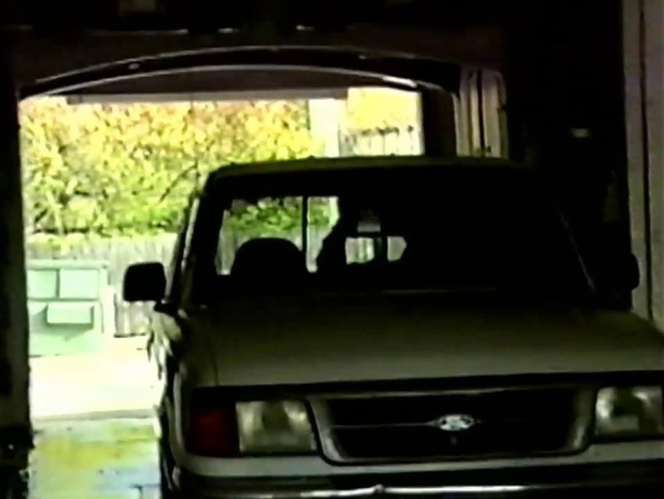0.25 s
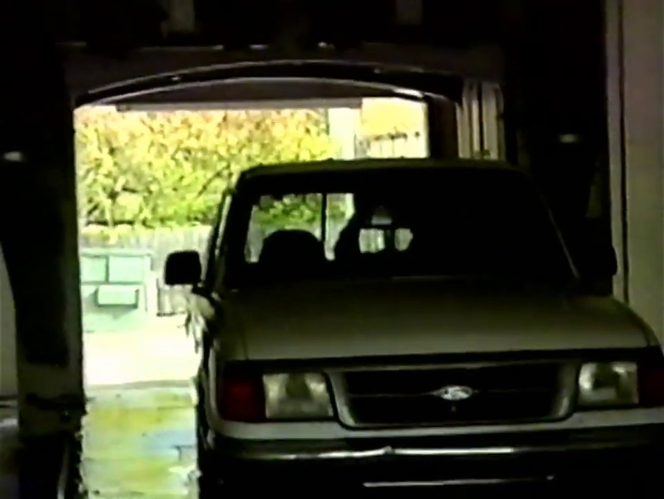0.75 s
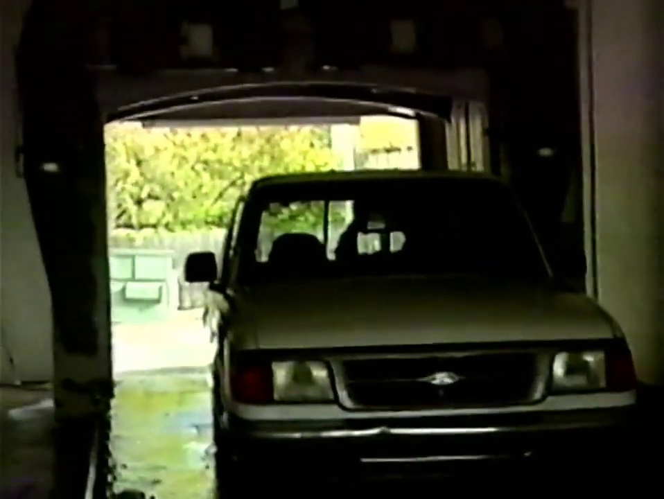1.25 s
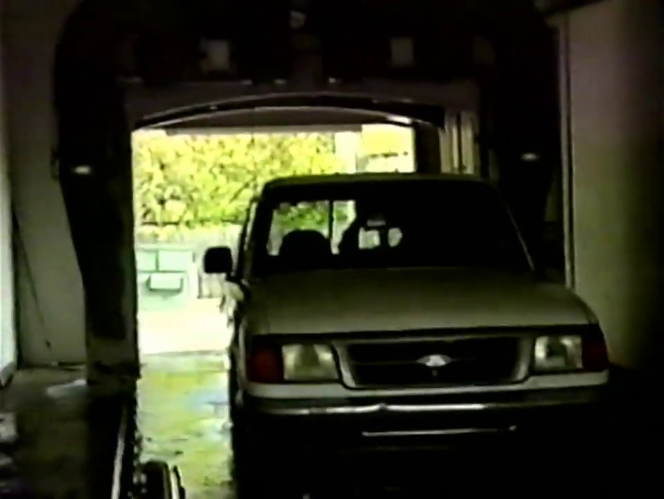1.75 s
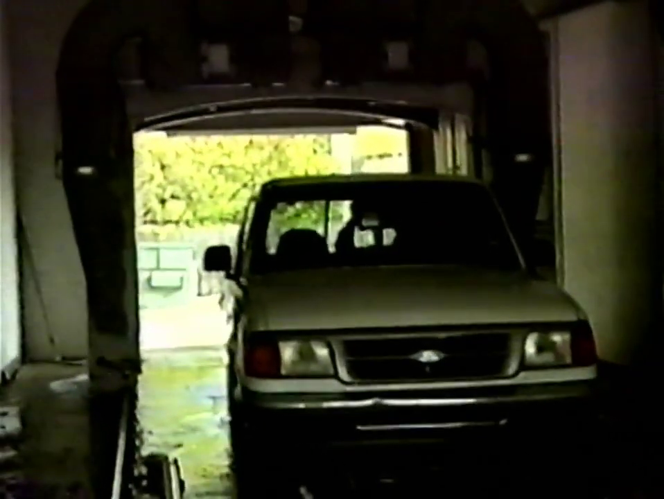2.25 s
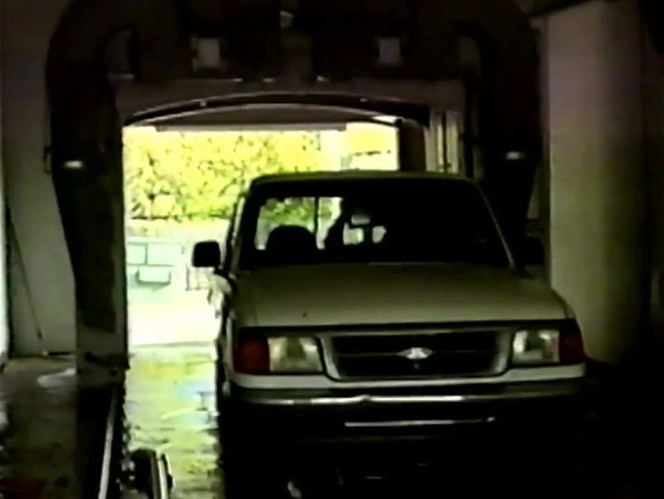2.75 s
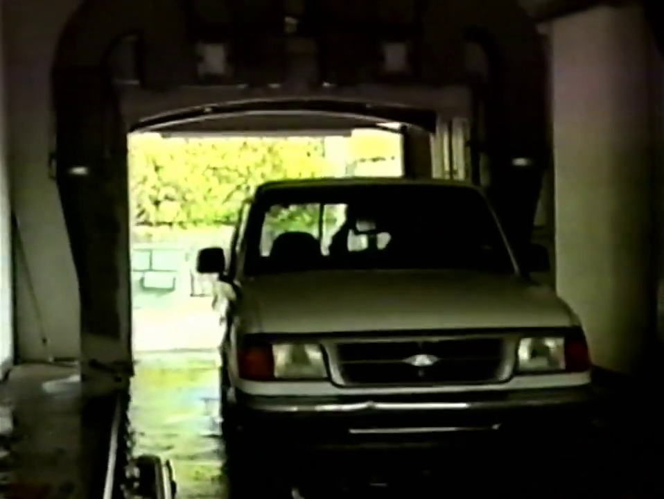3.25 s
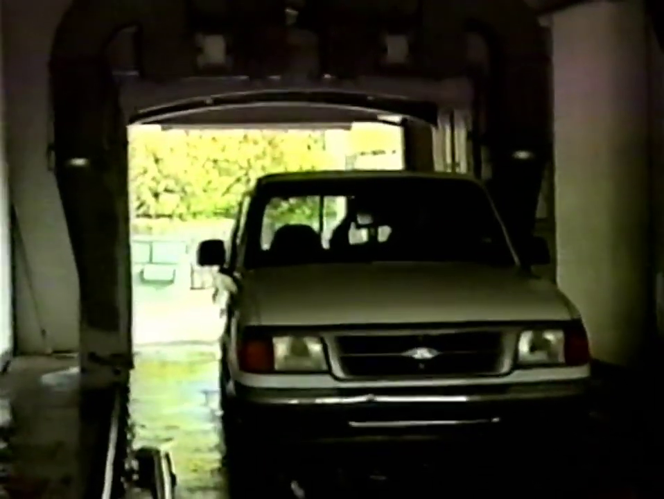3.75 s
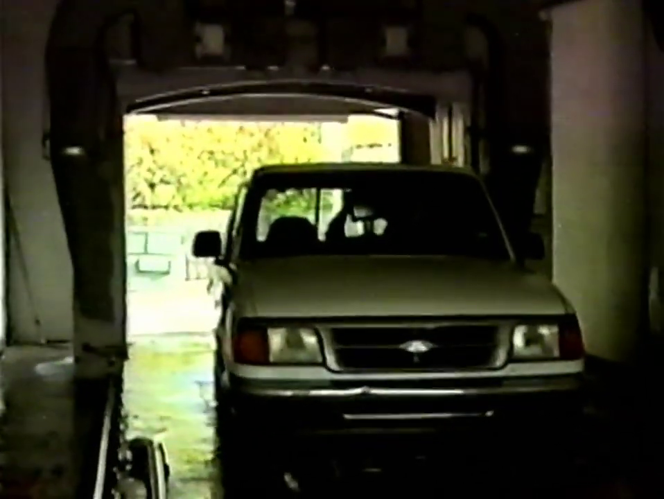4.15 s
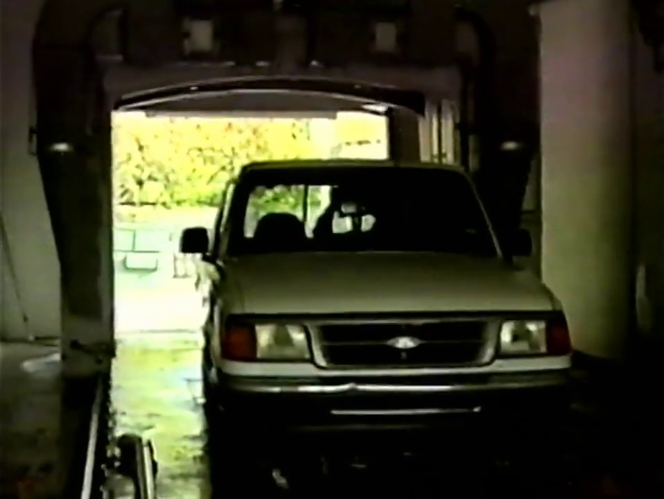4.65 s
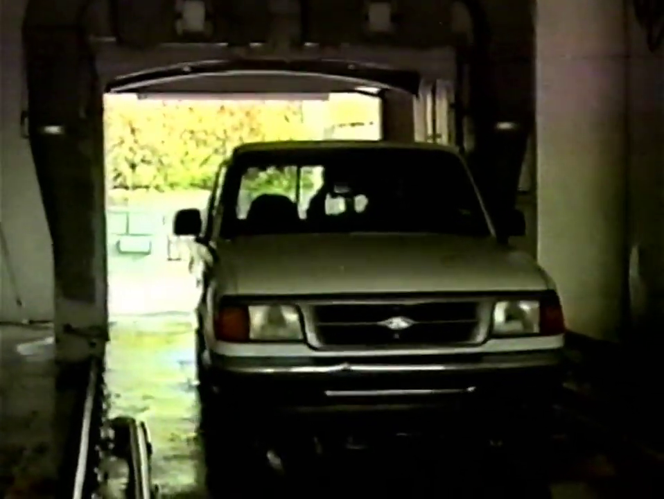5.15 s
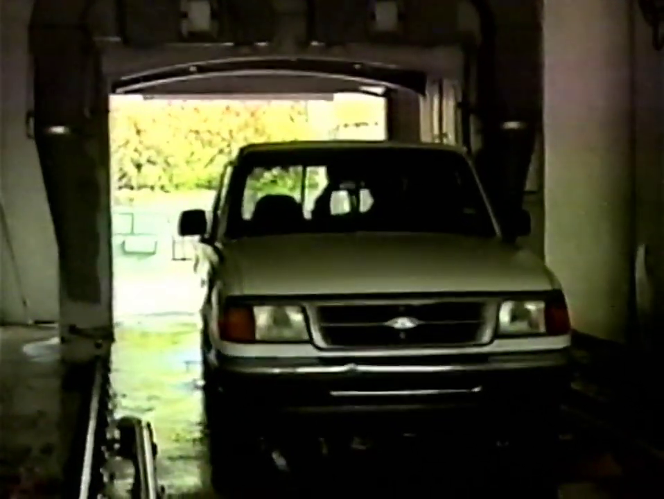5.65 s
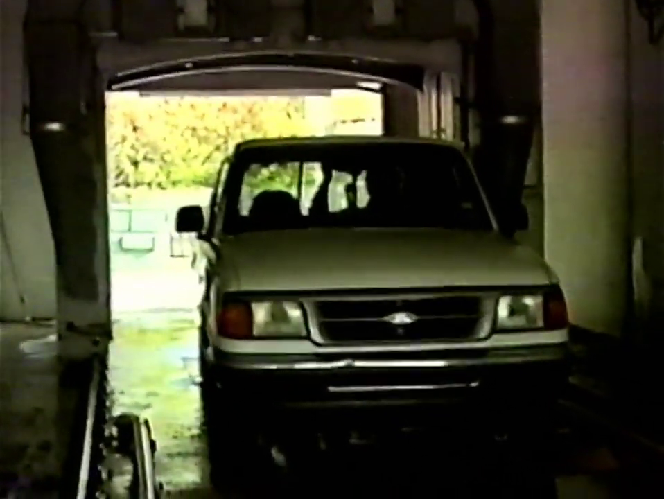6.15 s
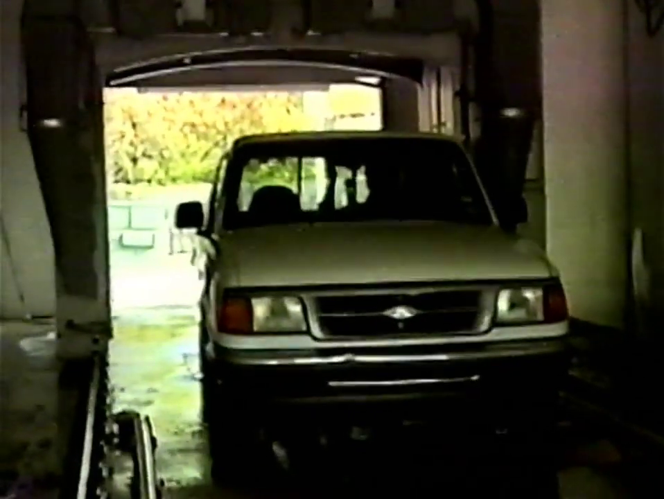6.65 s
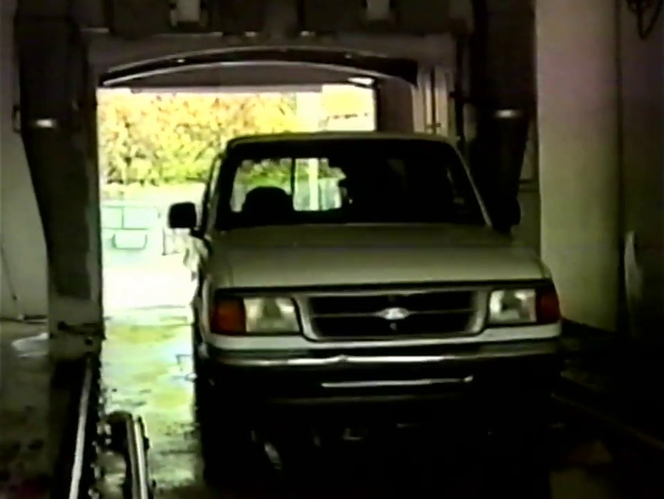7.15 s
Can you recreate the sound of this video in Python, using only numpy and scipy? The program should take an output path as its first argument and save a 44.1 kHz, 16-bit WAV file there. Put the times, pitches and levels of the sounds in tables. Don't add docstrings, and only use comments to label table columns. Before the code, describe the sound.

In a concrete wash bay with a pickup truck inside, two large blowers roar without pause. Their low, nearly equal blade drones beat together roughly twice a second, swelling and sinking over throaty rushing air and hollow wall resonance. An old camcorder microphone adds hiss, faint regular ticks, mains hum and a thin high whistle, with brief muffled drop-outs.

```python
import sys
import numpy as np
from scipy import signal
from scipy.fft import rfft, irfft, next_fast_len
from scipy.io import wavfile
from scipy.ndimage import uniform_filter1d, map_coordinates

SR = 44100
rng = np.random.default_rng(int(sys.argv[2]) if len(sys.argv) > 2 else 0)


def transcribe(u):
    v = np.clip(np.atleast_2d(u).T, -1, 1)
    q = np.round(v * 32767).astype(np.int16)
    wavfile.write(sys.argv[1], SR, q)


def elevation(decibels):
    levels = np.asarray(decibels, float)
    return 10 ** (levels / 20)


N = 326340
T = np.arange(N) / SR


def unit(x):
    return x / np.sqrt(np.mean(x ** 2) + 1e-20)


def along(points, hz):
    f, level = np.transpose(points)
    return np.interp(np.log(hz + 1), np.log(f + 1), level)


def curves(rows):
    times, *columns = np.transpose(rows)
    return [np.interp(T, times, column) for column in columns]


def wobble(rate):
    knots = rng.standard_normal(int(N * rate / SR) + 4)
    return map_coordinates(knots, [T * rate])


def filtered(x, response):
    size = next_fast_len(N + SR // 2)
    hz = np.fft.rfftfreq(size, 1 / SR)
    return irfft(rfft(x, size) * response(hz), size)[:N]


def rush(spectrum, patchy_db):
    cells = signal.stft(rng.standard_normal(N), nperseg=1024)[2]
    patches = uniform_filter1d(rng.standard_normal(cells.shape), size=5, axis=0)
    patches = unit(uniform_filter1d(patches, size=16, axis=1))
    patchy = signal.istft(cells * elevation(patchy_db * patches), nperseg=1024)[1][:N]
    return unit(filtered(patchy, lambda hz: elevation(along(spectrum, hz))))


def tone(hz):
    turns = np.cumsum(hz + 0 * T) / SR + rng.random()
    return np.sqrt(2) * np.sin(2 * np.pi * turns)


def wave(turns):
    return np.sqrt(2) * np.cos(2 * np.pi * turns)


# f/Hz, level/dB (per Hz)
DUCT_SPECTRUM = [(15, -58), (25, -34), (33, -43.5), (54, -34), (85, -38.5), (162, -14.5), (219, -7.5),
                 (254, -10), (295, -6.5), (375, -6.5), (476, -10), (500, -3.5), (650, -33), (1100, -120)]
# f/Hz, level/dB (per Hz)
NOZZLE_SPECTRUM = [(330, -32), (560, 0), (595, -2.5), (734, -3), (857, -6.5), (1050, -4.5), (1730, -9.5),
                   (2100, -16), (2730, -41.5), (4620, -120)]
# f/Hz, level/dB (per Hz)
JET_SPECTRUM = [(1120, -23.5), (1900, -3.5), (2110, 1), (5010, -10.5), (6010, -18), (7900, -36.5),
                (9000, -49.5), (11700, -70), (19800, -120)]


def air():
    gust = wobble(7)
    duct = elevation(-40.5 + .8 * wobble(3)) * rush(DUCT_SPECTRUM, patchy_db=.1)
    nozzle = elevation(-38 + .21 * gust + .15 * wobble(3)) * rush(NOZZLE_SPECTRUM, patchy_db=.5)
    jet = elevation(-43.6 + .46 * gust) * rush(JET_SPECTRUM, patchy_db=.44)
    return duct + nozzle + jet


# f/Hz, width/Hz, level/dB
BAY_MODES = [(151.4, 6.8, -60.5), (177.2, 14, -54.5), (233, 12, -52), (293.8, 22, -46.5), (442, 36, -45.5),
             (521, 24, -46), (551.6, 5.7, -51.5), (751, 87, -51.5)]


def bay():
    hum = np.zeros(N)
    for mode_hz, width, level_db in BAY_MODES:
        def resonance(f):
            off = f - mode_hz
            return width / np.sqrt(4 * off ** 2 + width ** 2) * (abs(off) < 4 * width)
        hum += elevation(level_db) * unit(filtered(rng.standard_normal(N), resonance))
    return hum


BLADES = 9
HUM_IN_STEP = .217
SHAFT_HZ = [58.23, 58.04]
BLADE_GAINED = [-.25, .37, .92, 1.58, 2.16, 2.67, 3.2, 3.76, 4.45, 5.2, 6.05, 6.77, 7.5]


def shaft_turns():
    second = SHAFT_HZ[1] * (T - HUM_IN_STEP)
    gained_blades = np.interp(T, BLADE_GAINED, np.arange(len(BLADE_GAINED)))
    return second + gained_blades / BLADES, second


# t/s, first fan level/dB, second fan level/dB
BLADE_LEVELS = [(0, -50, -38), (.45, -44, -42), (.9, -41, -39), (1.2, -46, -43), (1.6, -39, -36),
                (2.4, -37, -38.5), (3.0, -33.5, -40), (3.45, -32.5, -38), (3.9, -33, -45), (4.45, -34, -52),
                (4.85, -37.5, -39), (5.2, -38.5, -35.5), (6.1, -40, -36), (6.55, -35.5, -36),
                (7.05, -36, -40), (7.22, -42, -43), (7.4, -38, -39)]


def blade_tones(first, second):
    flutter_db = 1.4
    first_db, second_db = curves(BLADE_LEVELS)
    first_tone = elevation(first_db + flutter_db * wobble(16)) * wave(BLADES * first)
    second_tone = elevation(second_db + flutter_db * wobble(16)) * wave(BLADES * second)
    return first_tone + second_tone


THROB_LEVELS = [-75, -73]


def rotor_throbs(first, second):
    align_blades = 2.0
    first_throb = elevation(THROB_LEVELS[0]) * wave(first - align_blades / BLADES)
    return first_throb + elevation(THROB_LEVELS[1]) * wave(second)


ORDERS = [2, 18, 36, 54]
# first fan level/dB, second fan level/dB
ORDER_LEVELS = [(-67, -70.5), (-60.5, -64.5), (-62, -60.5), (-71, -65)]


def upper_orders():
    out = np.zeros(N)
    for fan, shaft_hz in enumerate(SHAFT_HZ):
        speed = shaft_hz * (1 + .002 * wobble(6))
        for order, level_db in zip(ORDERS, ORDER_LEVELS):
            out += elevation(level_db[fan] + 1.5 * wobble(1.5)) * tone(order * speed)
    return out


def fans():
    first, second = shaft_turns()
    return blade_tones(first, second) + rotor_throbs(first, second) + upper_orders()


def scene():
    return (air() + bay() + fans())[None]


def gain_control(x):
    share, reaction_s = .62, .1
    rest_power = elevation(-31.5) ** 2
    keep = np.exp(-1 / (reaction_s * SR))
    power = signal.lfilter([1 - keep], [1, -keep], x ** 2, zi=[rest_power])[0]
    return x * (power / rest_power) ** (-share / 2)


# f/Hz, level/dB (per Hz)
HISS_SPECTRUM = [(5000, -31.5), (8500, 0.5), (11300, 0), (14000, -1.5), (15100, 0), (15650, 2)]


def tape_hiss():
    return elevation(-75.5) * rush(HISS_SPECTRUM, patchy_db=.7)


FIELD_HZ = 59.94
# f/Hz, level/dB
MAINS_HUM = [(89.9, -76), (119.88, -72)]


def mains_hum():
    hum = elevation(-80) * wave(FIELD_HZ * (T - HUM_IN_STEP))
    for hz, level_db in MAINS_HUM:
        hum += elevation(level_db) * tone(hz)
    return hum


def head_ticks():
    start, gap = .0056, .050065
    since = (T - start) % gap
    tick = 1 + ((T - start) // gap).astype(int)
    size_db = rng.normal(0, 1.5, int(N / SR / gap) + 3)[tick]
    burst = elevation(-57.8 + size_db - 60 * since / .005) * rng.standard_normal(N)
    colour = [(3000, -14), (8000, 3), (11000, -4), (15000, -6.5)]  # f/Hz, level/dB
    return filtered(burst, lambda hz: elevation(along(colour, hz)))


def scan_whistle():
    blank = np.exp(-((T * FIELD_HZ % 1 - .5) / .05) ** 2)
    return elevation(-67.0 + 1.2 * wobble(6)) * (1 - .5 * blank) * tone(15733.35)


# t/s, half length/s, loss level/dB
LIFTS = [
    (2.22, .02, 1),
    (4.235, .014, 3.5),
    (4.586, .027, 10),
    (5.625, .011, 4),
    (6.535, .02, 4),
    (6.582, .035, 9.5),
]


def dropouts(x):
    loss_db = sum(db * np.exp(-((T - s) / half) ** 2) for s, half, db in LIFTS)
    bass = filtered(x, lambda hz: 1 / (1 + (hz / 900) ** 2))
    treble = x - bass
    return elevation(-.35 * loss_db) * bass + elevation(-loss_db) * treble


def top_cut(x):
    return signal.sosfilt(signal.butter(12, 15745, fs=SR, output="sos"), x)


def record(dry):
    x = dropouts(gain_control(dry[0]))
    saturated = x / (1 + np.abs(x / .13) ** 4) ** .25
    noises = tape_hiss() + mains_hum() + head_ticks() + scan_whistle()
    taped = saturated + noises + .0017
    return top_cut(taped[None])


dry = scene()
out = record(dry)
transcribe(out)
```